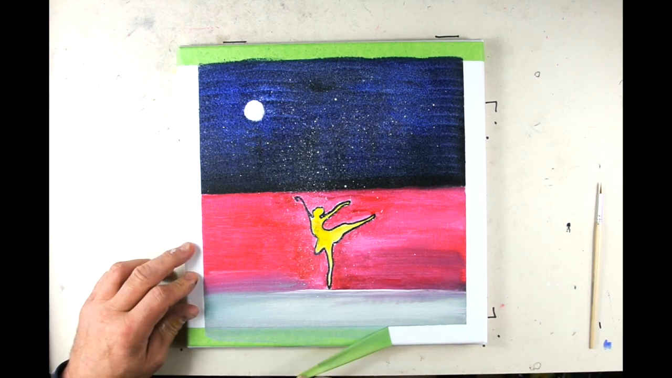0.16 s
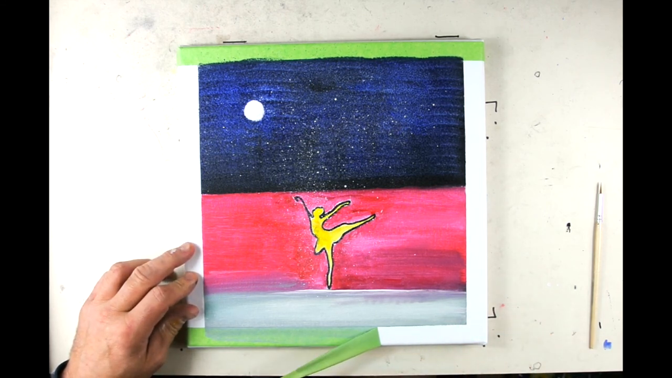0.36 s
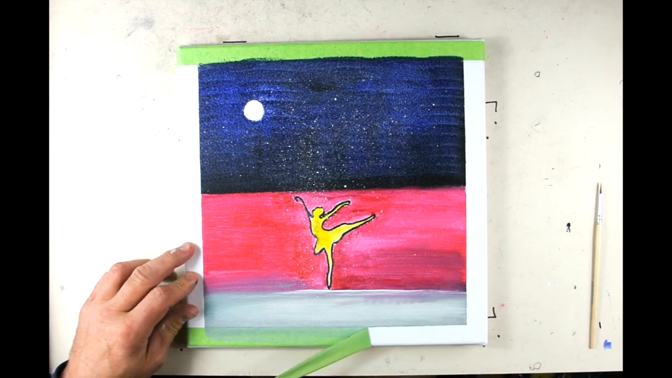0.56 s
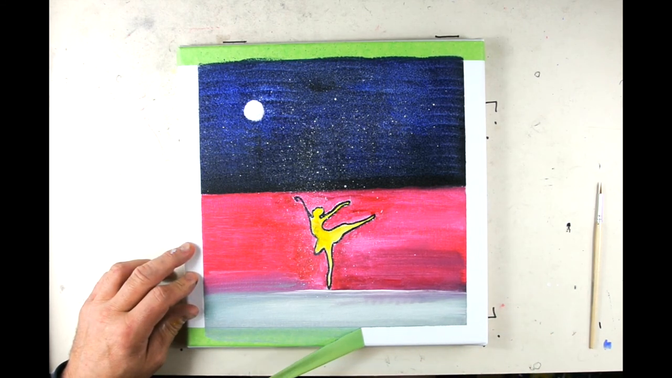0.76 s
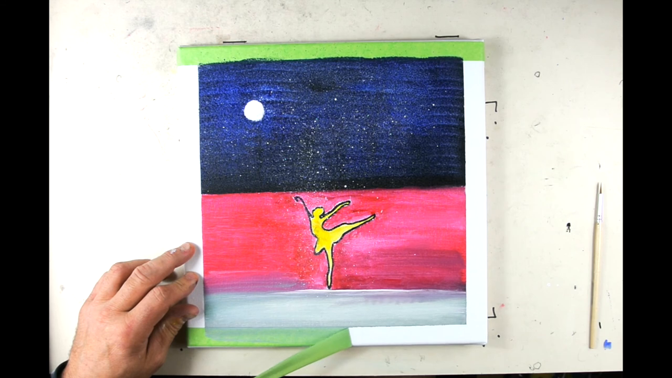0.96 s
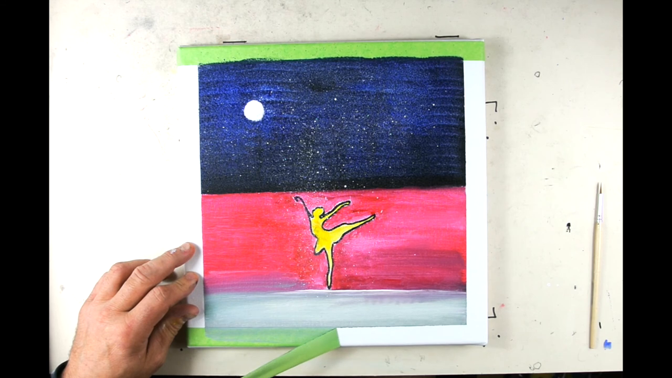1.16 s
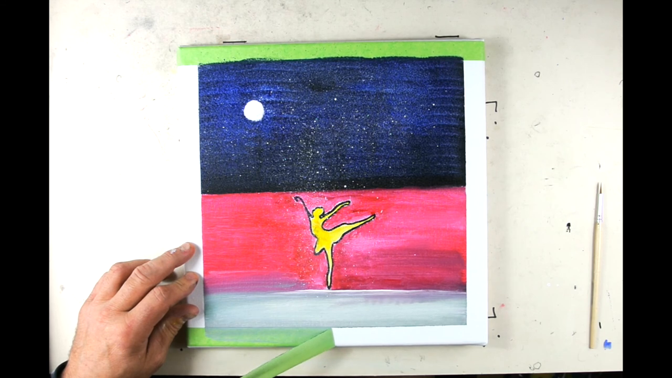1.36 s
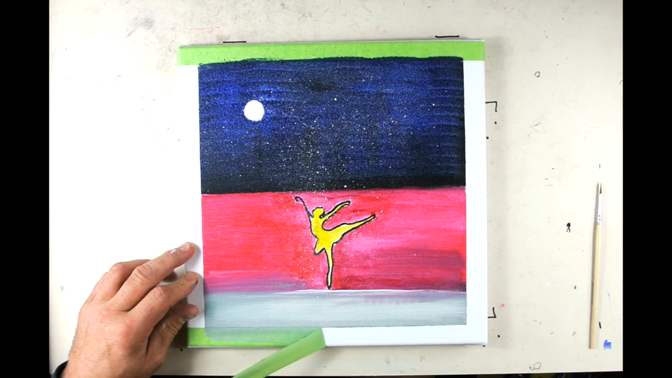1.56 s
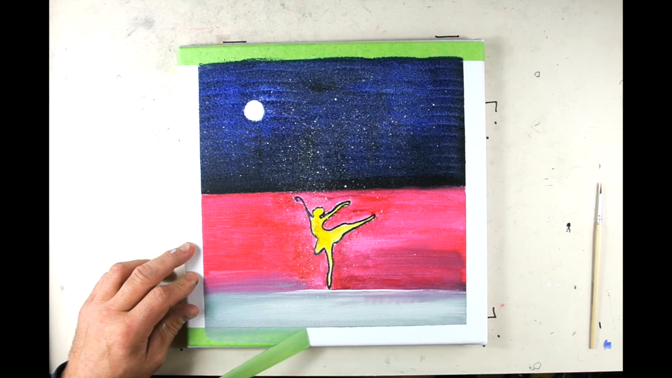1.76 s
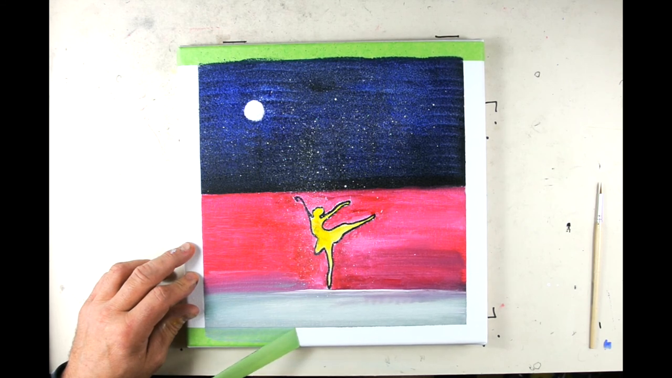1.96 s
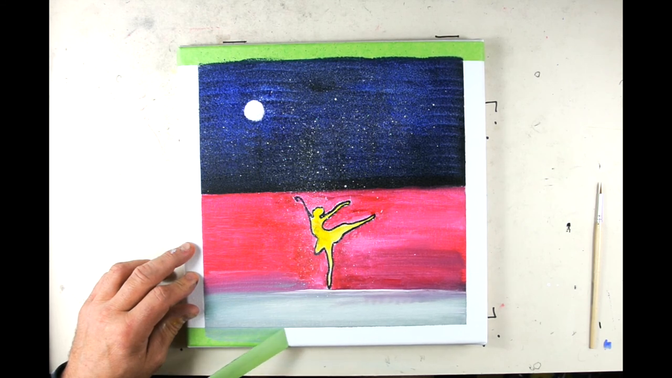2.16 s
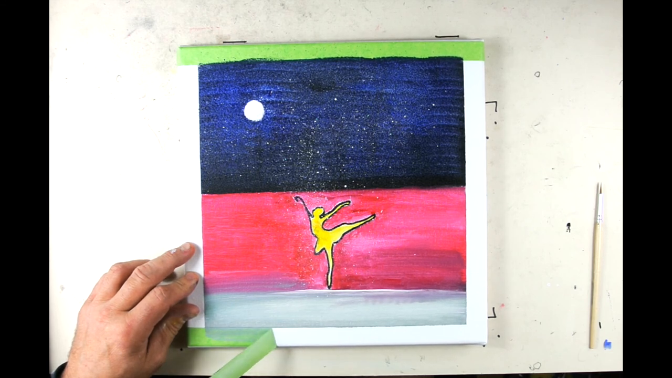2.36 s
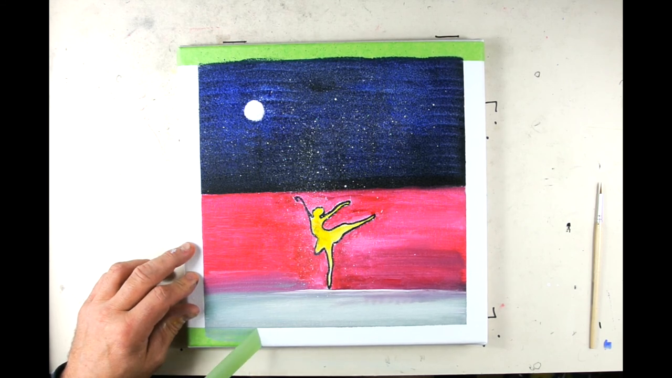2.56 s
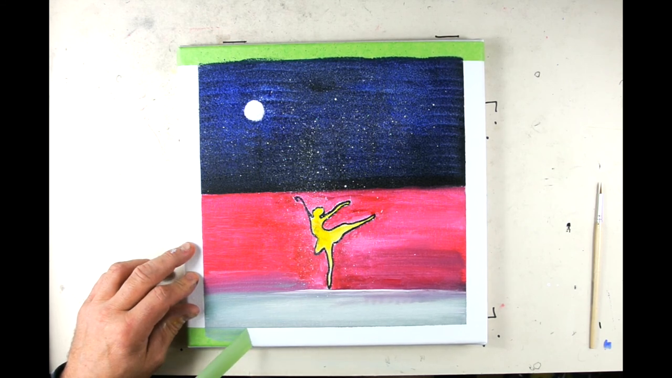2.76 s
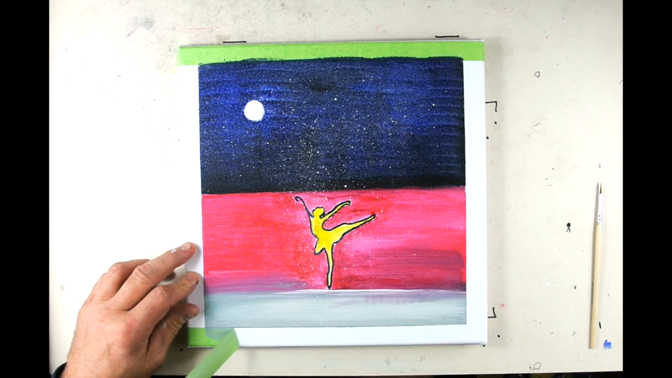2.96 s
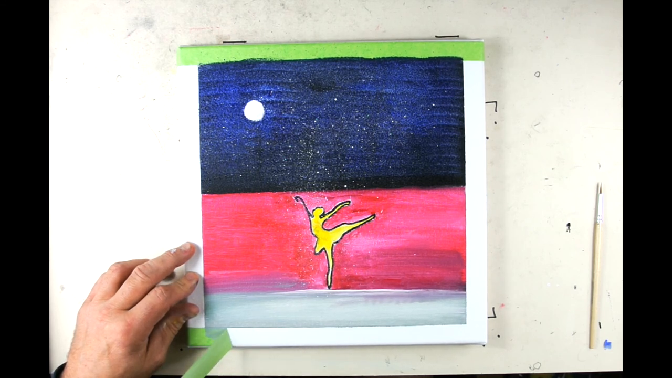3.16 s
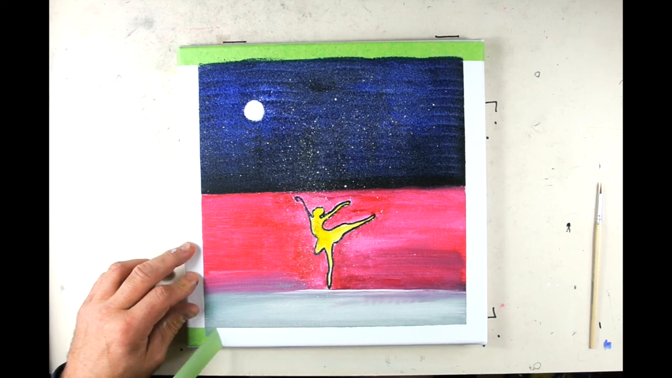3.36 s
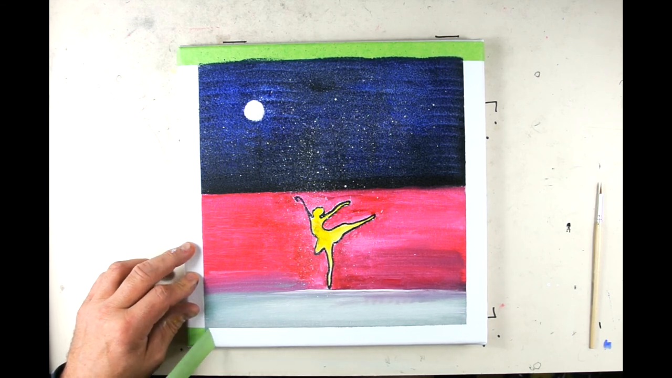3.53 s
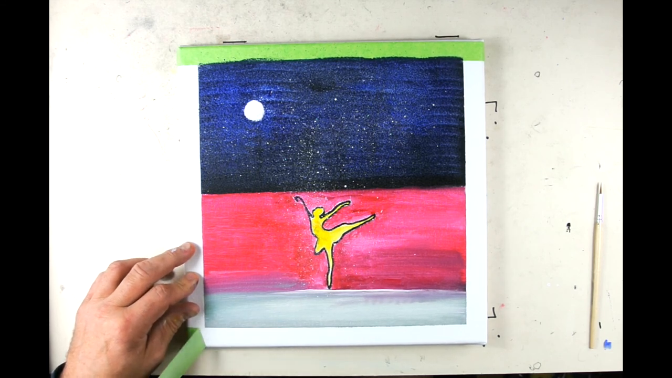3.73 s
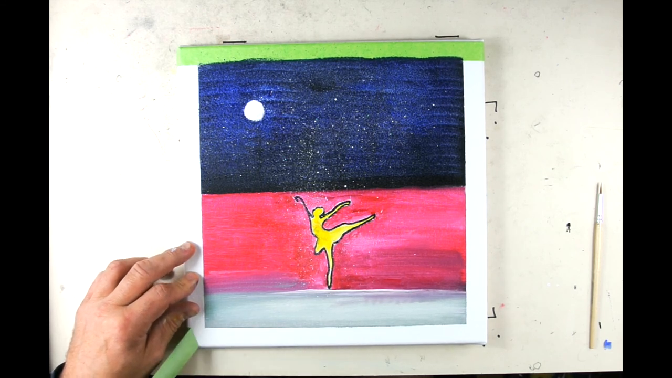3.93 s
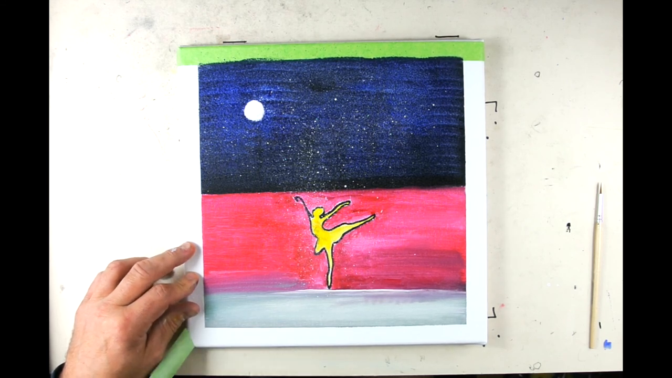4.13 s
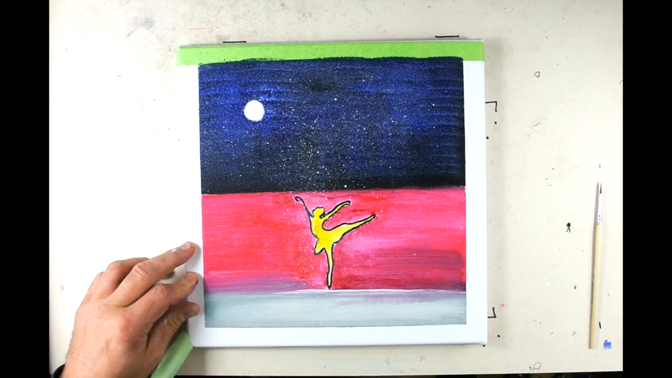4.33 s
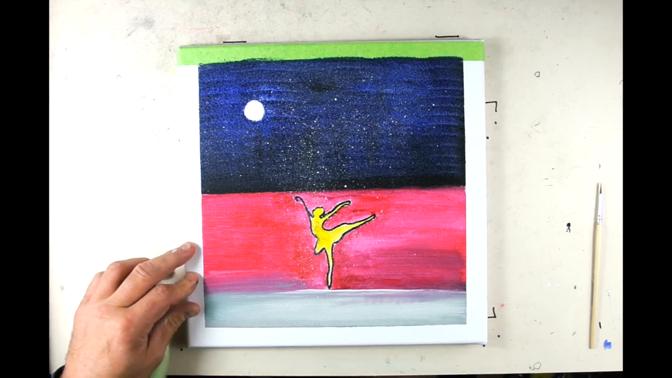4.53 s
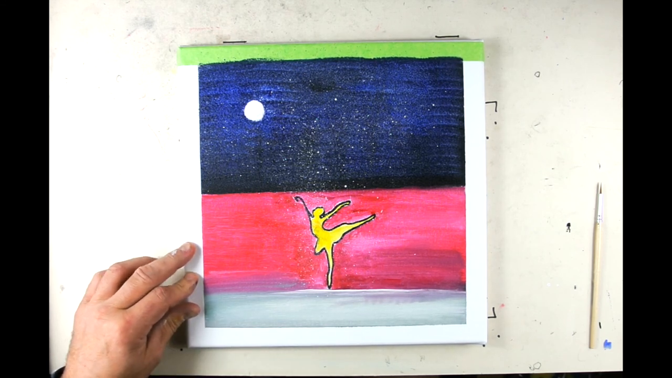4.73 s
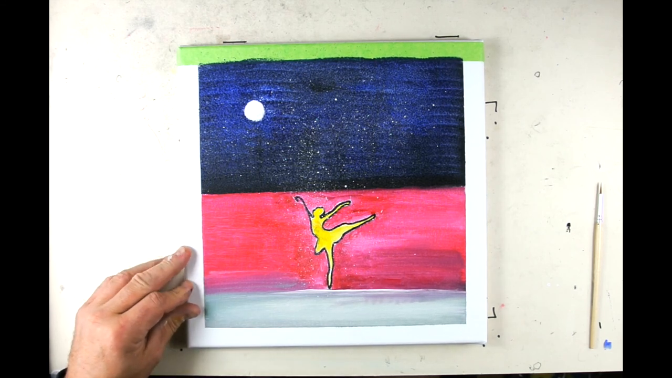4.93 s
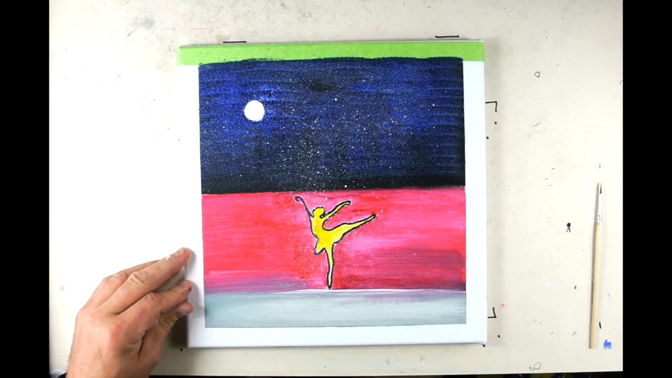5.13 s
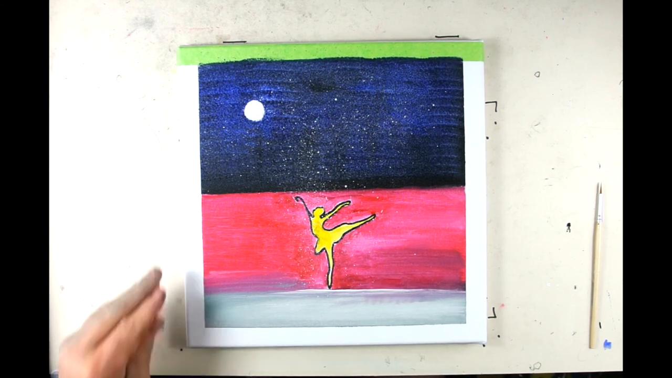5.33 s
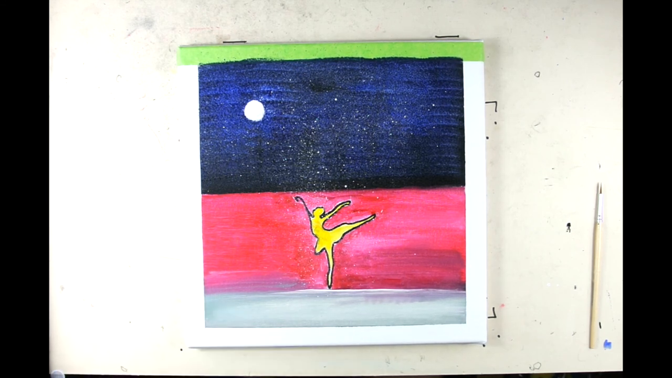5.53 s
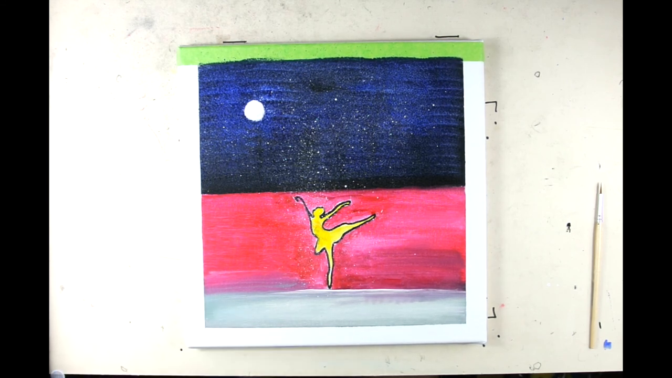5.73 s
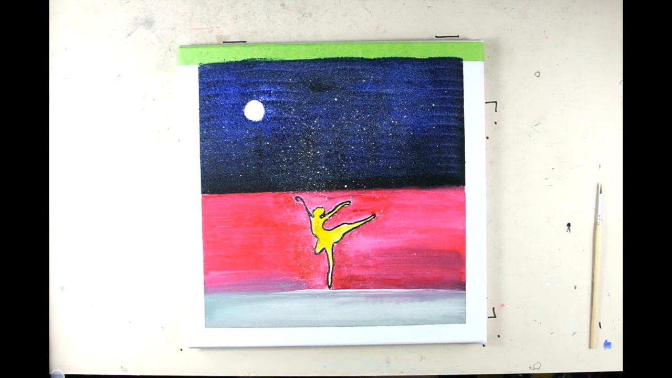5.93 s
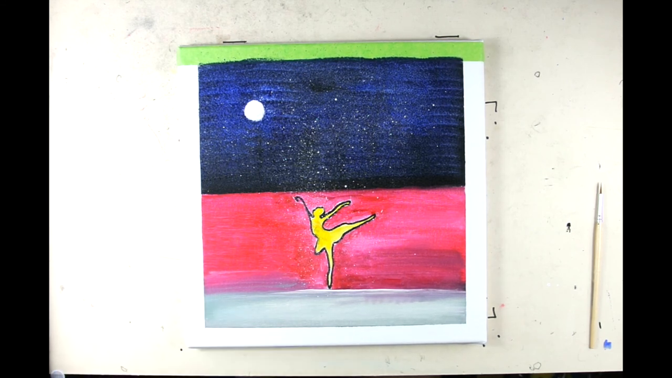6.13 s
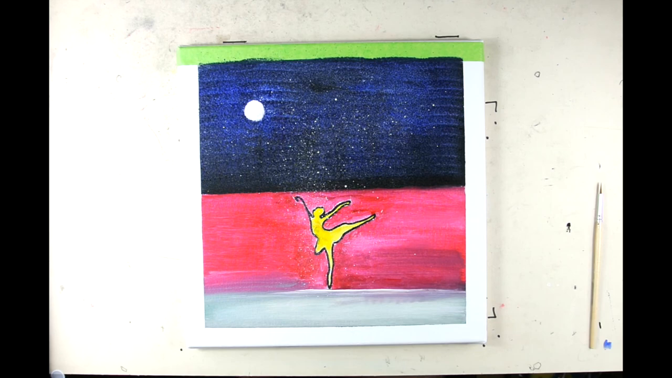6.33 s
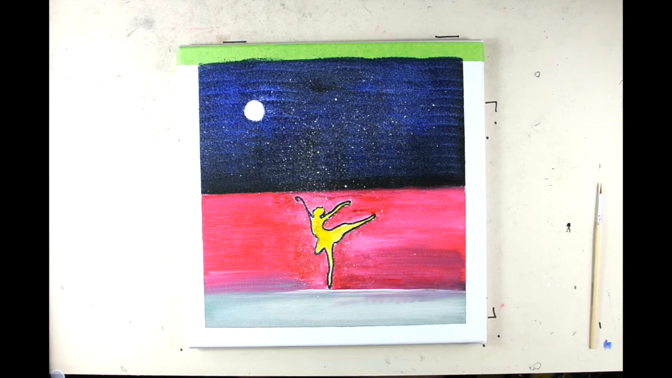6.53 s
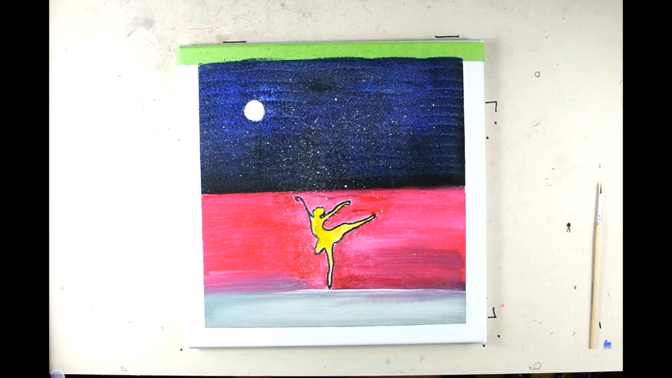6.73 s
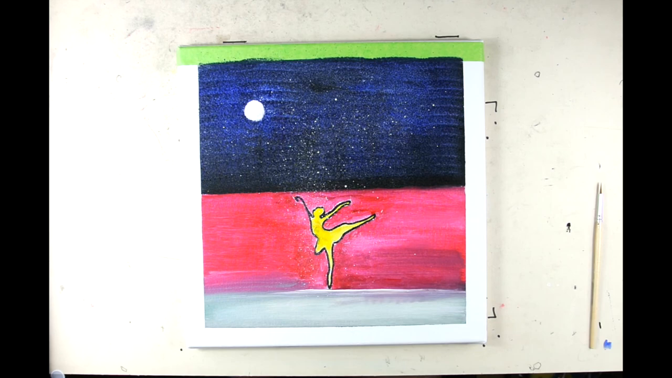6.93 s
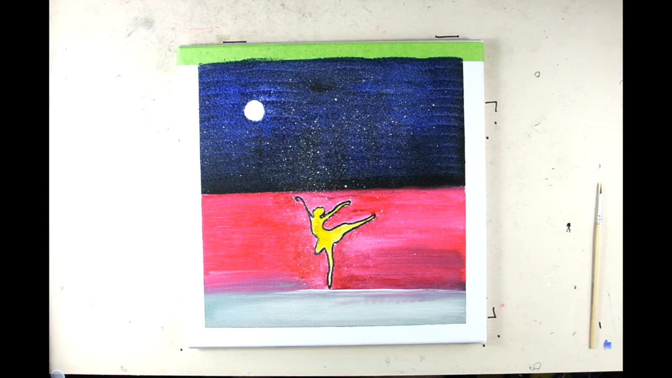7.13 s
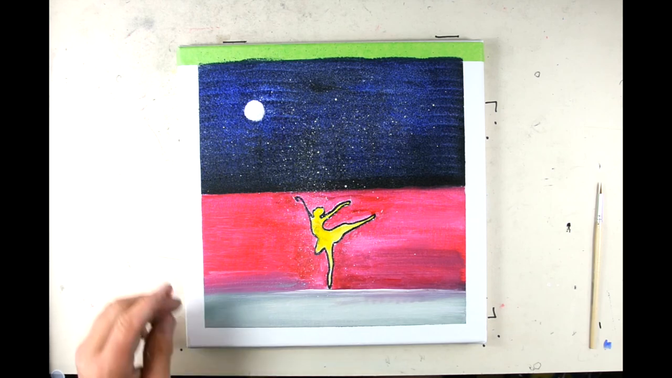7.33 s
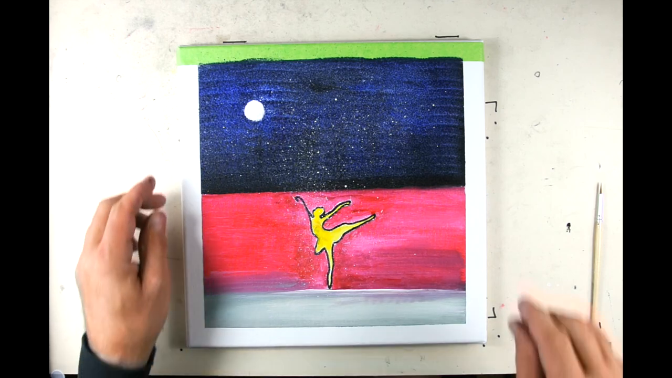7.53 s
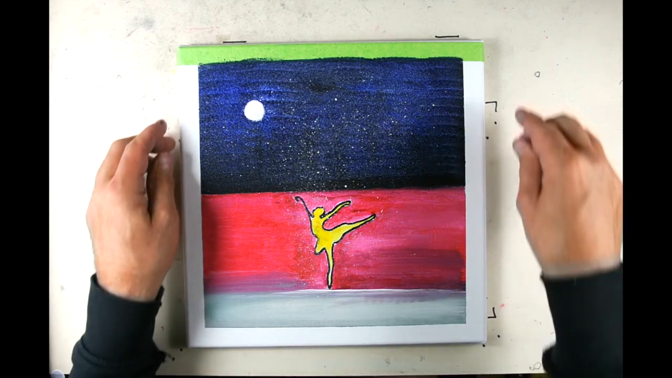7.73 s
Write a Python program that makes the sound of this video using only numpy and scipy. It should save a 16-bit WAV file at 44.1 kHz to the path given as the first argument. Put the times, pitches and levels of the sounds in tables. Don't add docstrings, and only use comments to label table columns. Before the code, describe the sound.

Close up in a quiet, bare room, tape is pulled off a canvas: a crackling rasp of dense glue ticks surges and thins for over four seconds, with sharp pops and papery flutter. A hard clustered snap frees it. Soft desk knocks, light rubbing and a quick crumple follow, then a distant small rattle and thin steady hiss.

```python
import sys
import numpy as np
from scipy import signal
from scipy.fft import rfft, irfft, next_fast_len
from scipy.io import wavfile

SR = 44100
rng = np.random.default_rng(int(sys.argv[2]) if len(sys.argv) > 2 else 0)


def gain_from_decibels(decibels):
    exponent = np.asarray(decibels, float) / 20
    return 10 ** exponent


def to_wav(sig):
    pcm = np.clip(np.atleast_2d(sig), -1, 1) * 32767
    pcm = np.round(pcm).astype(np.int16)
    wavfile.write(sys.argv[1], SR, pcm.T)


N = 348081

# (time [s], canvas drive [dB], tape tautness [dB])
GRIP = [(0, -13, -8), (.06, -2, -5.5), (.5, -4.5, -16), (1, -5, -5), (1.35, -2.5, 2.5), (2, -1, -7),
        (2.6, -0.5, -12), (3.1, -1.5, -10), (3.4, 0.5, 2), (3.72, -1.5, -0.5), (3.93, -13.5, -1.5),
        (4.1, -10.5, -11), (4.46, -28, -10), (4.5, 14, -14)]


def peel():
    # (time [s], peak [dB], canvas ring re peak [dB])
    edge_releases = [(.0382, -6, -17), (.0895, -13.5, -16.5), (.131, 0.5, -28), (.1376, -7, -15.5),
                     (.1794, -7, -17.5), (.187, -6, -20), (.2254, -7, -18), (.271, -15, -30),
                     (.4418, -13.5, -15), (.4877, -13, -13), (.8633, -11.5, -12.5), (.9162, -22, 0),
                     (.982, -2, -20), (1.0005, -7, -18), (1.0124, -9.5, -15), (1.4946, -12, -35),
                     (1.5314, -1, -18), (1.5973, 5.5, -19), (1.6626, -16, -8), (1.702, -5, -23),
                     (1.7499, -5, -13), (1.9615, -3.5, -19.5), (2.0093, -6, -19), (2.036, -9.5, -10.5),
                     (2.2737, -10, -10.5), (2.372, -4, -20), (2.4518, -10, -22), (2.5427, -14, -2.5),
                     (2.8041, -5, -15), (2.9166, -15, -17)]
    # (time [s], peak [dB], canvas ring re peak [dB])
    further_releases = [(2.2464, -11.5, -14), (2.4737, -16, -12), (2.4972, -7.5, -8), (2.511, -10, -9),
                        (2.5304, -10, -11), (2.5932, -11.5, -9.5), (2.7503, -15, -5.5), (2.8596, -22.5, 0),
                        (2.9707, -20, -5), (3.099, -25, -8.5), (3.2888, -20.5, -1), (3.3727, -25, 4.5),
                        (3.4544, -12, -24), (3.6931, -18.5, -11), (3.3448, -18, -8), (3.4091, -16, -5.5),
                        (3.5874, -15, -11.5), (3.7995, -11.5, -21), (3.8599, -14.5, -14.5),
                        (3.913, -16, -26), (3.931, -12, -30), (3.997, -32, -29), (4.0365, -16, -36),
                        (4.0778, -11, -24), (4.1808, -13, -51), (4.2327, -17.5, -28), (4.2643, -21, -34),
                        (4.3835, -16.5, -28), (4.4008, -12, -24), (4.4592, -19, -17)]
    # (time [s], peak [dB], canvas ring re peak [dB])
    snap_free = [
        (4.4691, -20, -27),
        (4.4795, -6, -24),
        (4.4832, -9, -25),
        (4.4866, -16, -14),
        (4.4891, -6, -22),
        (4.494, -5, -27),
        (4.4969, -13, -25),
        (4.5022, -18, -16),
    ]
    # (time [s], peak [dB])
    creases = [(5.477, -31), (5.4919, -27), (5.4996, -27), (5.5048, -27), (5.5168, -23), (5.5298, -27),
               (5.5395, -26), (5.548, -20), (5.5553, -23), (5.5612, -25), (5.5684, -26), (5.5754, -33)]
    # (frequency [Hz], level per Hz [dB])
    tear_colour = [(1180, -10), (2000, -6), (2310, -3), (2750, -4), (3650, 3), (5100, 1), (11700, 1),
                   (15600, -3.5)]
    # (time [s], level [dB])
    sheen_gain = [(0, 8), (1.1, 2.5), (2, -0.5), (3.6, -6), (4.3, 2.5), (5.5, 5.5)]
    # (frequency [Hz], width [Hz], level at start, midway, near the corner [dB])
    canvas_modes = [(99, 99, -8, -13, -17), (151, 67, -10.5, -12, -14), (274.3, 64, -6.5, -9.5, -13),
                    (386, 65, -6.5, -8, -9.5), (711, 173, -4.5, -2.5, -6.5), (889, 110, 0.5, 2, 1.5),
                    (1220, 159, 2.5, -1.5, 0), (1415, 122, 3, -0.5, 1), (1620, 196, 1, 2, 1.5),
                    (1833, 144, 1, -1.5, 1), (2280, 350, -2, -6, -1)]
    # (frequency [Hz], width [Hz], level at start, midway, near the corner [dB])
    tape_modes = [(2695, 51, -32, -2, 3), (3010, 180, -29, 6, 3.5), (3200, 240, -32, 3.5, -21),
                  (3660, 180, -6, 4, 2), (4240, 440, -34, -13, -14), (4720, 160, -1.5, -3, -21),
                  (5260, 90, -27, -47, -10)]

    tear_db, canvas_db, flap_db, cloth_db = pull()
    releases = edge_releases + further_releases + small_releases(tear_db, cloth_db, count=160)
    ticks = glue_ticks(per_s=2200, spread_db=2.0, clump_db=0.72)
    flurry = aftershocks(releases, level_db=-19.5, lead_s=0.0013, die_s=0.0035)
    flurry = flurry + aftershocks(snap_free, level_db=-25, lead_s=0.001, die_s=0.003)

    stuck = tear_db > -150
    signs = rng.choice([-1, 1], N)
    air = scatter(ticks * (gain_from_decibels(tear_db - 2.5) + flurry), die_s=0.0012, share=0.28, late=3)
    cloth = ticks * signs * stuck * gain_from_decibels(canvas_db + 8)
    strip = scatter(ticks * stuck * gain_from_decibels(flap_db + 5.5), die_s=0.00042, share=0.41)

    release, shove = cracks(releases, level_db=-1.5, ring_db=28.5, die_s=0.0012)
    snap, snap_shove = cracks(snap_free, level_db=7, ring_db=27, die_s=0.0016)
    snap = snap * gain_from_decibels([[0], [0], [-4.5]])
    crease_rows = [(s, peak_db, -12) for s, peak_db in creases]
    crease, crease_shove = cracks(crease_rows, level_db=5, ring_db=24, die_s=0.0006)

    air = coloured(air + release + snap + crease, tear_colour)
    sheen = filtered(air, 2, 9000)
    air = air + (gain_from_decibels(in_time(sheen_gain + [(N / SR, 0)])[0]) - 1) * sheen
    canvas = resonate(cloth + shove + snap_shove, along_edge(canvas_modes, wander_db=3.0))
    flap = resonate(strip + gain_from_decibels(5) * release, along_edge(tape_modes, wander_db=4.5))
    slack = resonate(gain_from_decibels(-2) * snap, [(3230, 930, 3.4), (5670, 1700, 11.4)])
    paper = resonate(crease_shove, [(2010, 560, 0)])
    return air + canvas + flap + slack + paper


def pull():
    # (peak time [s], level [dB], rise [s], fall [s])
    tugs = [(.07, -39.5, 0.13, 0.45), (.24, -38.5, .15, 0.12), (.5, -36, 0.21, 0.24),
            (.76, -39.5, 0.33, 0.62), (.985, -26.5, 0.19, 0.16), (1.4, -40, 0.49, 0.63),
            (1.63, -30, 0.28, 0.29), (1.87, -36.5, 0.63, 0.26), (2.22, -34, 0.5, 0.62),
            (2.52, -27.5, 0.25, 0.17), (2.8, -33, 0.31, 0.58), (3.01, -40, 0.2, 0.11),
            (3.369, -33, 0.32, 0.19), (3.69, -34.5, 0.27, 0.26), (3.93, -35.5, 0.22, .15),
            (4.1, -34.5, 0.075, 0.074), (4.39, -41, 0.16, 0.58), (4.49, -42, .1, 0.039)]
    free_s = 4.52
    t = np.arange(N) / SR
    power = sum(swell(*row) ** 2 for row in tugs)
    tear_db = np.where(t < free_s, 10 * np.log10(power), -200)
    cloth_db, taut_db = in_time(GRIP)
    extra_swing_db = 0.067 * (tear_db + 38)
    return tear_db, tear_db + cloth_db + extra_swing_db, tear_db + taut_db, cloth_db


def swell(peak_s, level_db, rise_s, fall_s):
    t = np.arange(N) / SR - peak_s
    away = np.minimum(np.where(t < 0, -t / rise_s, t / fall_s), 4)
    return gain_from_decibels(level_db - 28 * away ** 1.89)


def glue_ticks(per_s, spread_db, clump_db):
    sizes = gain_from_decibels(spread_db * np.minimum(rng.exponential(1, N), 4.5))
    clumps = gain_from_decibels(clump_db * (drift(12.6) + 1.2 * drift(61)))
    return rms_one(sizes * clumps * (rng.random(N) < per_s / SR))


def small_releases(tear_db, cloth_db, count):
    place, size = rng.random((count, 2)).T
    s = (np.arange(count) + place) * GRIP[-2][0] / count
    at = (s * SR).astype(int)
    peak_db = tear_db[at] + 14.5 - 4 * np.log(1.12 - size)
    return list(zip(s, peak_db, cloth_db[at] - 10))


def cracks(table, level_db, ring_db, die_s):
    s, peak_db, body_db = np.transpose(table)
    lag, strength = rng.random((len(s), 2)).T
    size = gain_from_decibels(peak_db + level_db)
    echo = strikes(s + 0.00005 + 0.0003 * lag, 0.8 * strength * size)
    spikes = strikes(s, size) - echo
    shove = strikes(s, gain_from_decibels(peak_db + body_db + ring_db))
    return scatter(spikes, die_s, share=0.14), shove


def aftershocks(table, level_db, lead_s, die_s):
    s, peak_db, _ = np.transpose(table)
    fall = np.exp(-1 / (die_s * SR))
    rise = np.exp(-2 / (lead_s * SR))
    start = strikes(np.maximum(s - lead_s, 0), gain_from_decibels(peak_db + level_db))
    return signal.lfilter([1 - rise], [1, -rise], signal.lfilter([1], [1, -fall], start))


def along_edge(modes, wander_db):
    stages = [.6, 2.2, 3.6]
    t = np.arange(0, N + 64, 64) / SR
    knots = np.arange(0, t[-1] + 0.1, 0.04)
    wander = wander_db * rng.standard_normal((len(modes), len(knots)))
    moving = []
    for (hz, width, *db), own in zip(modes, wander):
        level_db = np.interp(t, stages, db) + np.interp(t, knots, own)
        moving.append((hz, width, np.repeat(level_db, 64)[:N]))
    return moving


def scatter(ticks, die_s, share, late=0):
    r = np.exp(-1 / (die_s * SR))
    splash = np.sqrt(signal.lfilter([0, 1], [1, -r * r], ticks ** 2 + 1e-18))
    left, right = share * splash * rng.standard_normal((2, N))
    aside = ticks * (rng.random(N) < 0.5)
    return np.array([left - ticks + aside - np.roll(aside, late), right - ticks, -ticks])


def rub():
    # (peak time [s], high level [dB], rise [s], fall [s], low level re high [dB])
    rubs = [
        (4.842, -52, 0.14, 0.11, -3),
        (5.03, -57, 0.036, .1, -2),
        (5.5, -45, .02, 0.028, -9),
        (5.55, -43, .02, 0.037, -14),
        (5.8, -50, .04, 0.1, -24),
        (5.97, -52.5, .3, 0.11, -20),
        (7.89, -52, 0.067, .1, -7),
    ]
    grains = rng.standard_normal((2, 2, N)) * gain_from_decibels(1.2 * drift(60))
    high = rms_one(filtered(grains[0], 2, 4500))
    low = rms_one(resonate(grains[1], [(1380, 660, 11), (2300, 2500, 0.5)]))
    return sum(gain_from_decibels(6.5) * swell(*row) * (high + gain_from_decibels(low_db) * low) for *row, low_db in rubs)


def drops():
    # (time [s], level [dB], colour [Hz], width [Hz], room feed [dB])
    landings = [
        (6.2682, -10, 3660, 1900, 6.5),
        (6.4011, -14.5, 1900, 3200, 19),
        (6.419, -12.5, 1220, 1730, 18.5),
        (6.692, -21.5, 1300, 3000, 17.5),
        (6.688, -16, 7240, 9000, 15.5),
        (6.7108, -18.5, 5970, 8900, 14.5),
    ]
    out = 0
    for s, level_db, hz, width, room_db in landings:
        hit = scatter(strikes([s], [gain_from_decibels(level_db)]), die_s=0.0005, share=0.63)
        body = resonate(resonate(hit, [(hz, width, 0)]), [(hz, 1.9 * width, 0)])
        hit = body + gain_from_decibels(-12.5) * hit
        out = out + hit * gain_from_decibels([[0], [0], [room_db]])
    return out


def bumps():
    # (time [s], peak [dB], pitch [Hz])
    knocks = [
        (4.478, -37, 360),
        (4.839, -48, 380),
        (4.928, -40, 307),
        (5.028, -49, 398),
        (5.13, -39.5, 304),
        (5.342, -46, 304),
        (5.531, -46, 347),
        (5.958, -43.5, 310),
        (6.399, -49, 304),
        (4.59, -38.5, 247),
    ]
    out = 0
    for s, peak_db, hz in knocks:
        push = scatter(strikes([s + 0.0048], [gain_from_decibels(peak_db + 33.5)]), die_s=0.024, share=0.076)[0]
        ring = resonate(push, [(hz, 220, 0), (105, 70, 5)])
        out = out + resonate(ring, [(220, 490, 0)])
    return out


def room(x):
    # (frequency [Hz], t60 [s], level [dB])
    bands = [(454, 0.91, 1), (1510, 0.45, -0.5), (3560, 0.86, -0.5), (7400, 0.51, 2.5), (13600, 0.16, 7)]
    t = np.arange(SR // 2) / SR
    tail = 0
    for hz, t60, level_db in bands:
        band = signal.butter(1, [hz / 1.58, min(hz * 1.39, 0.45 * SR)], "band", fs=SR, output="sos")
        noise = signal.sosfilt(band, rng.standard_normal((2, len(t))))
        tail = tail + noise * gain_from_decibels(level_db - 60 * t / t60)
    tail = tail * np.clip((t - 0.003) / 0.0013, 0, 1)
    tail = tail / np.sqrt(np.sum(tail ** 2) / 2)
    shared = 0.94 * signal.lfilter([0.25], [1, -0.75], tail.sum(axis=0))
    return signal.fftconvolve(x, tail + shared, axes=1)[:, :N]


def preamp_hiss():
    # (frequency [Hz], level [dB])
    hiss_colour = [(13, -44), (22, -10), (270, -8), (594, -7), (1350, -6), (2160, -6.5), (3540, -7),
                   (15600, -8)]
    white = rng.standard_normal((3, N))
    bass = signal.lfilter([0.08], [1, -0.92], white[2])
    return gain_from_decibels(-45) * rms_one(coloured(white[:2] + 0.78 * bass, hiss_colour))


def rms_one(x):
    return x / np.sqrt(np.mean(x ** 2) + 1e-20)


def filtered(x, order, hz):
    return signal.sosfilt(signal.butter(order, hz, "high", fs=SR, output="sos"), x)


def in_time(rows):
    s, level_db, *rest = np.transpose(rows)
    t = np.arange(N) / SR
    return [np.interp(t, s, level_db, -200, -200)] + [np.interp(t, s, c) for c in rest]


def coloured(x, spectrum):
    hz, level_db = np.transpose(spectrum)
    size = next_fast_len(N)
    log_hz = np.log(np.arange(size // 2 + 1) * SR / size + 1)
    gain = gain_from_decibels(np.interp(log_hz, np.log(hz), level_db))
    return irfft(rfft(x, size) * gain, size)[..., :N]


def drift(rate):
    r = np.exp(-2 * np.pi * rate / SR)
    return rms_one(signal.lfilter([1], [1, -2 * r, r * r], rng.standard_normal(N + SR))[SR:])


def resonate(x, modes):
    out = 0
    for k, (hz, width, level_db) in enumerate(modes):
        r = np.exp(-np.pi * width / SR)
        top = (-1) ** k * (1 - r * r) / 2
        drive = x * gain_from_decibels(level_db) + 1e-18
        out = out + signal.lfilter([top, 0, -top], [1, -2 * r * np.cos(2 * np.pi * hz / SR), r * r], drive)
    return out


def strikes(times, gains):
    out = np.zeros(N)
    np.add.at(out, np.minimum((np.array(times) * SR).astype(int), N - 1), gains)
    return out


def scene():
    tape = filtered(peel() + drops(), 2, 90)
    return tape[:2] + rub() + bumps() + room(gain_from_decibels(-6) * tape[2:])


def band_limit(x):
    return signal.sosfilt(signal.butter(12, 16990, fs=SR, output="sos"), x)


def record(dry):
    x = 1.1 * np.tanh(dry / 1.1) + preamp_hiss()
    x = filtered(x, 1, 80)
    x = signal.sosfilt(signal.ellip(12, 0.5, 75, 15760, fs=SR, output="sos"), x)
    return band_limit(x)


dry = scene()
out = record(dry)
to_wav(out)
```